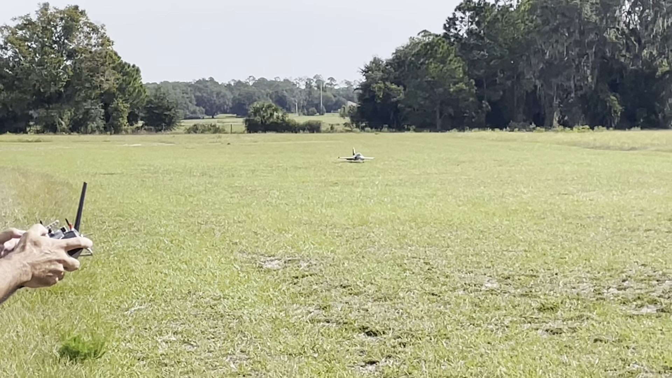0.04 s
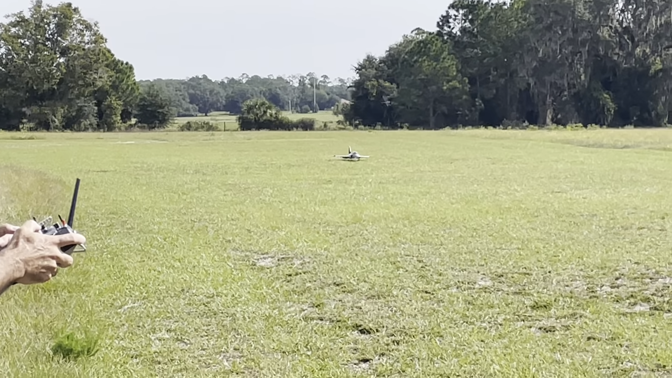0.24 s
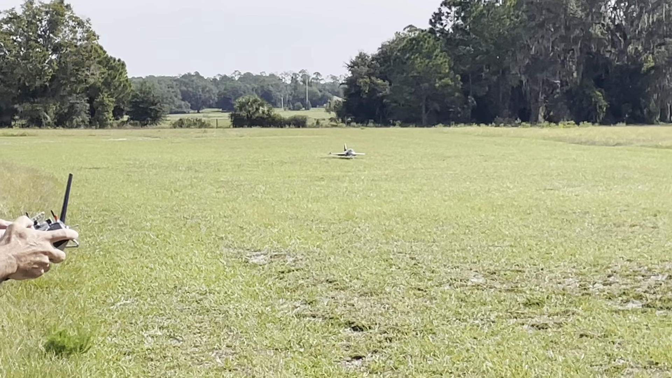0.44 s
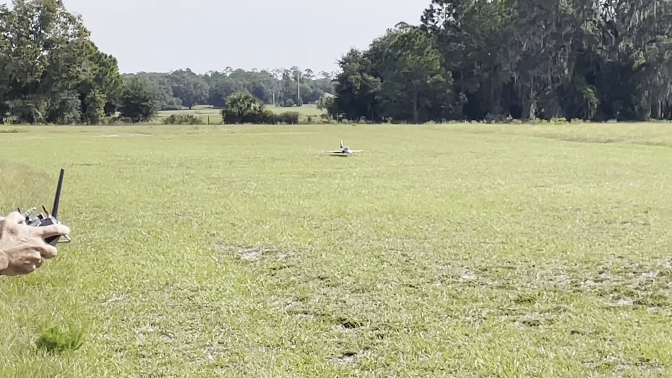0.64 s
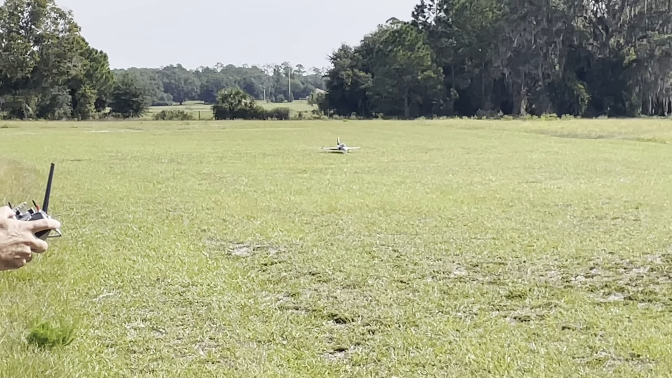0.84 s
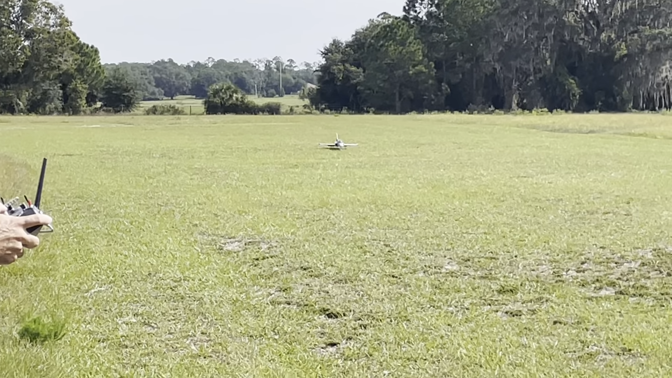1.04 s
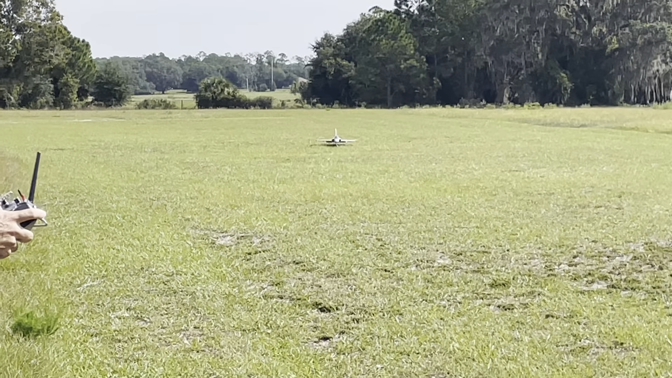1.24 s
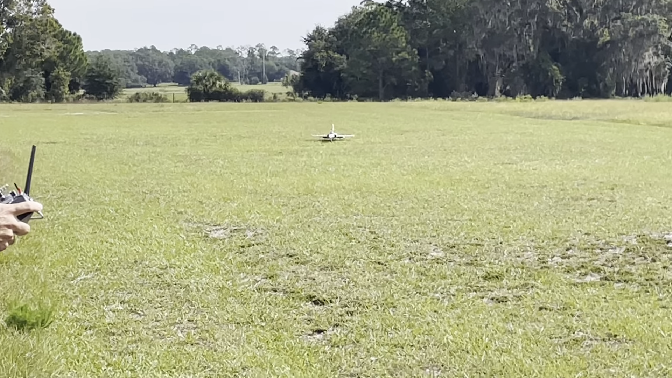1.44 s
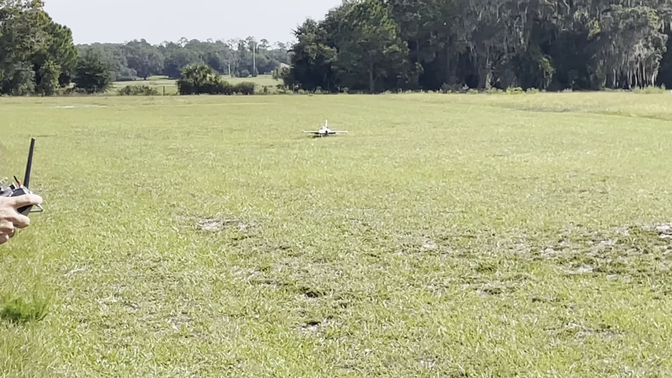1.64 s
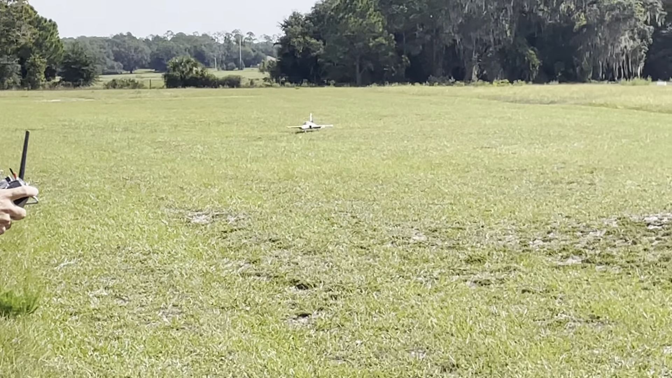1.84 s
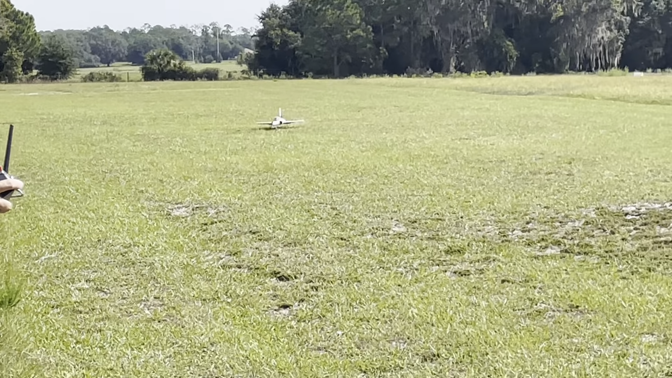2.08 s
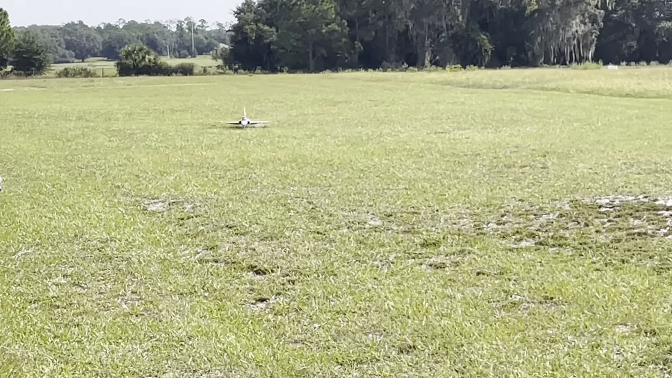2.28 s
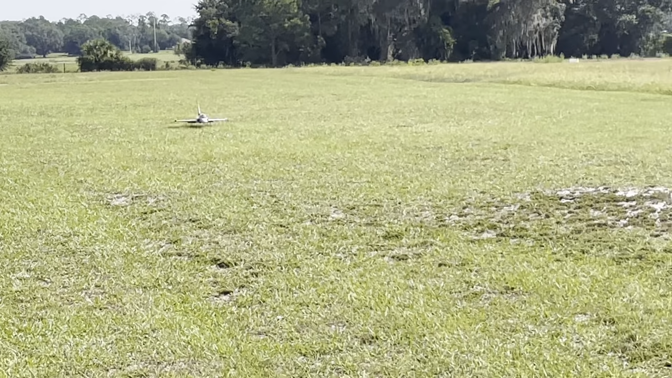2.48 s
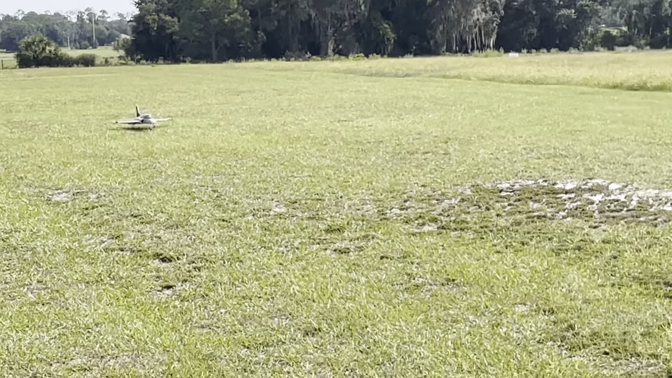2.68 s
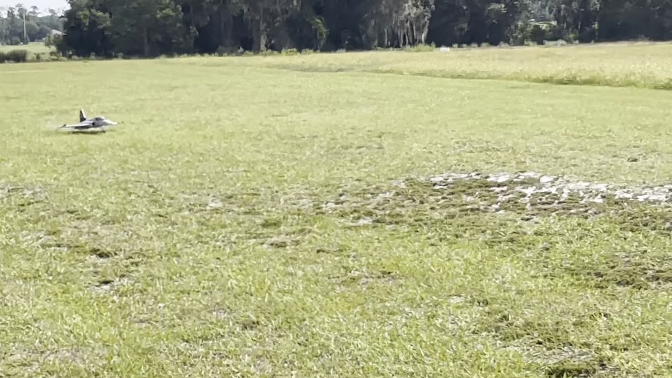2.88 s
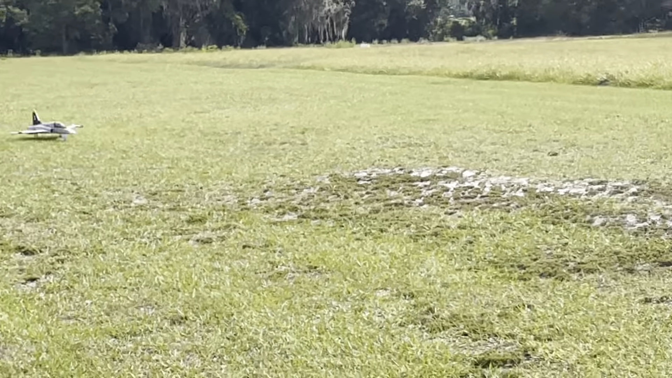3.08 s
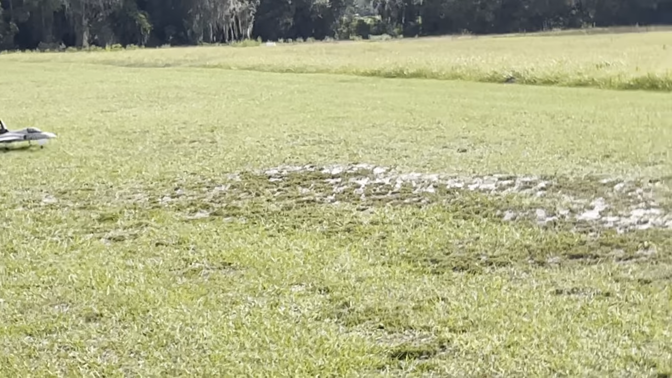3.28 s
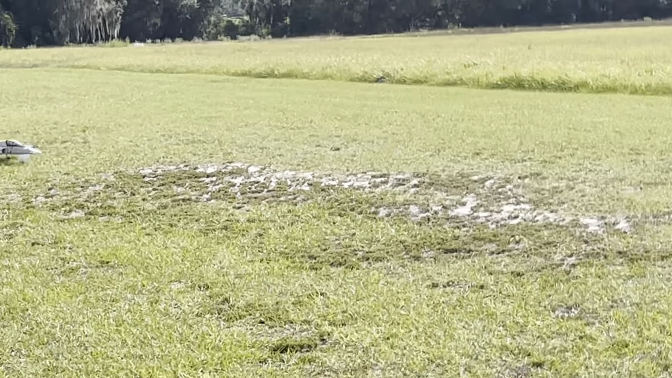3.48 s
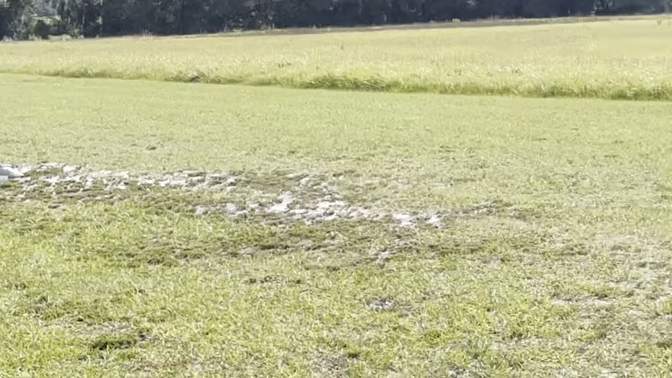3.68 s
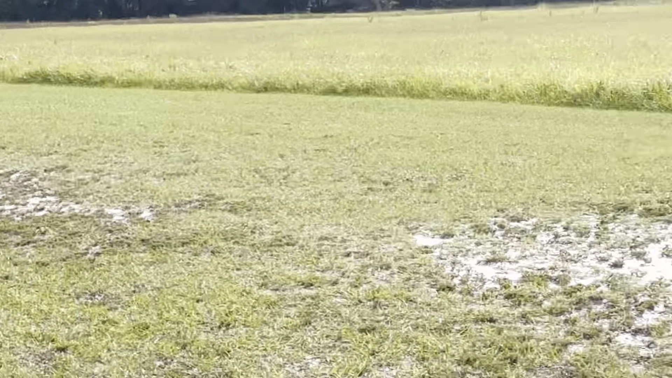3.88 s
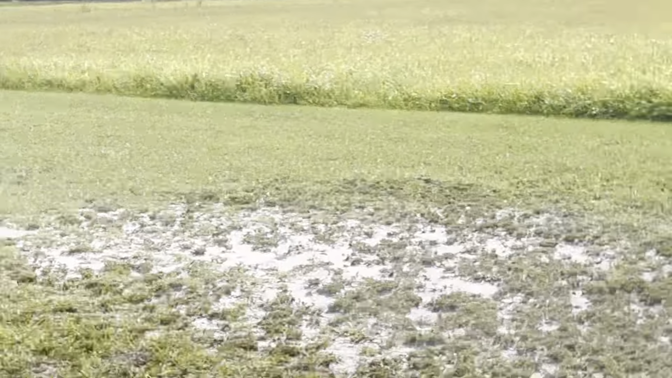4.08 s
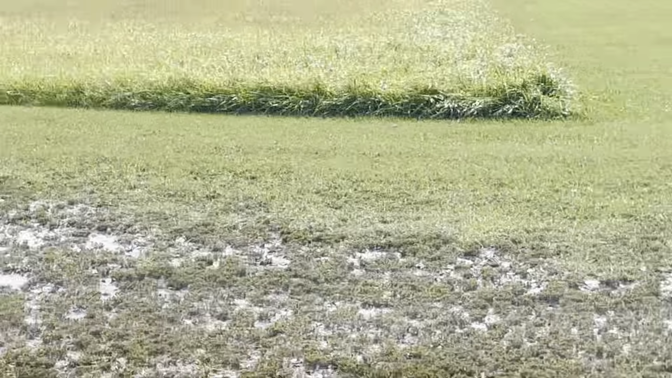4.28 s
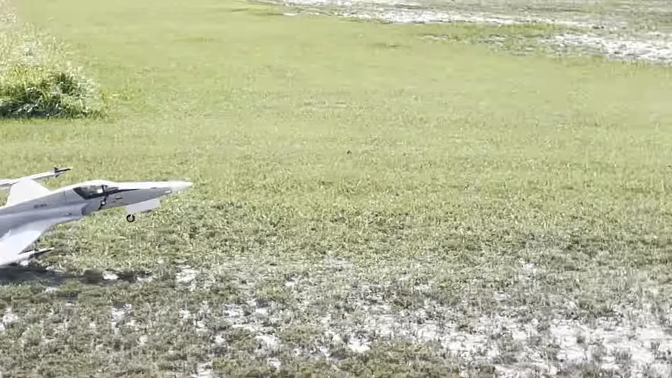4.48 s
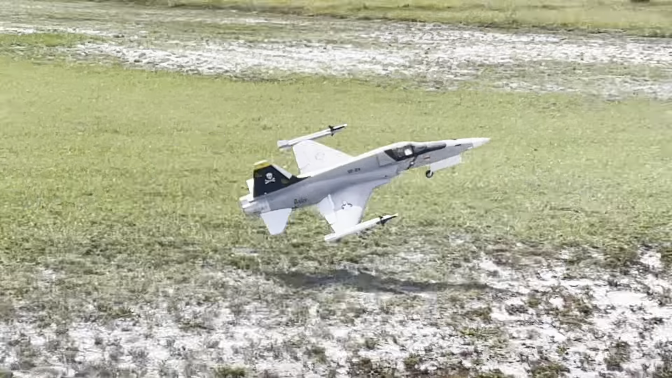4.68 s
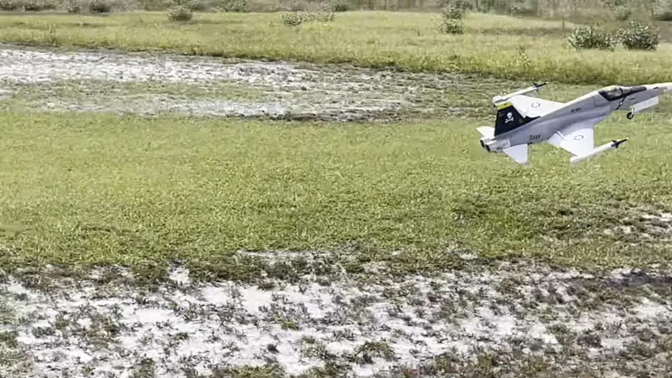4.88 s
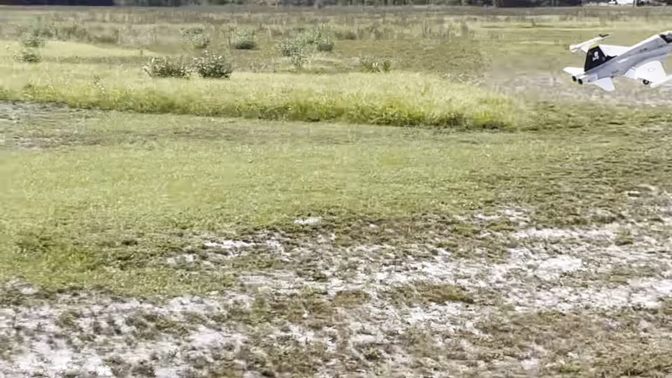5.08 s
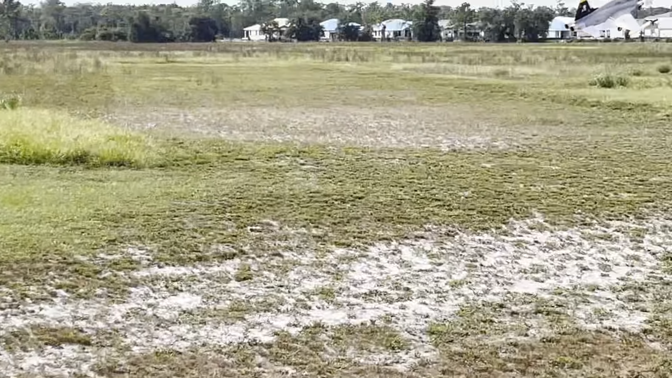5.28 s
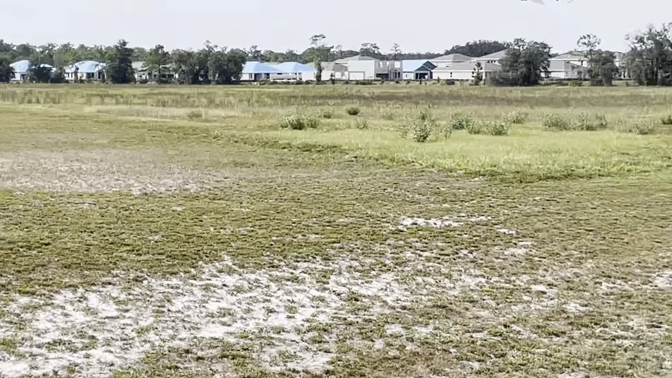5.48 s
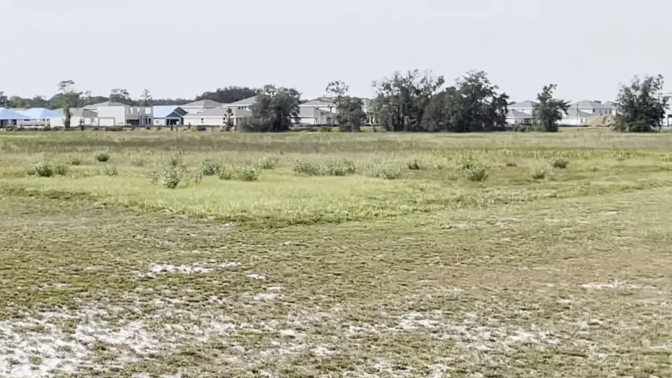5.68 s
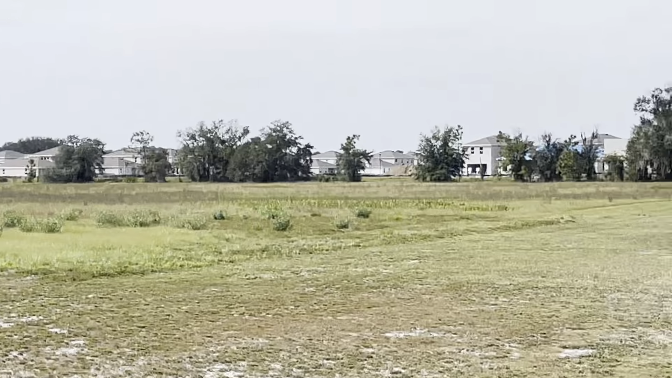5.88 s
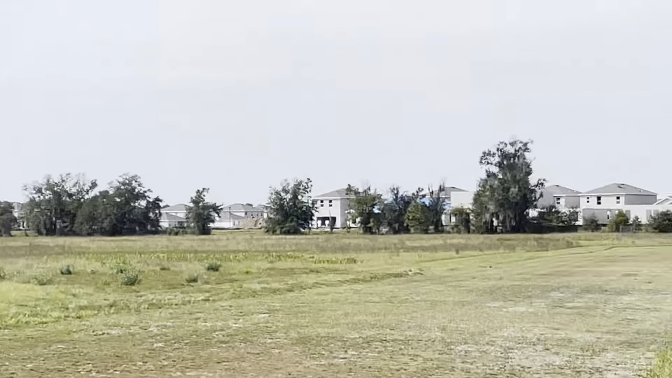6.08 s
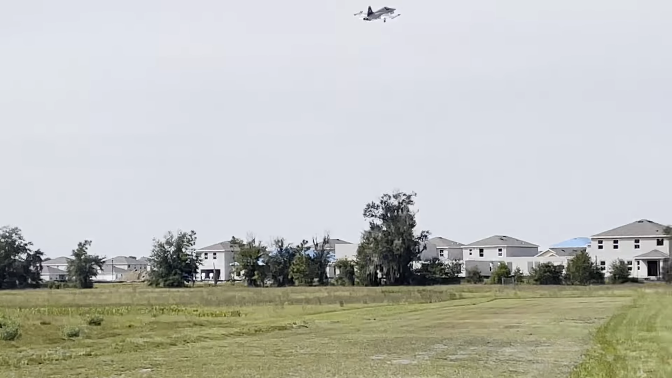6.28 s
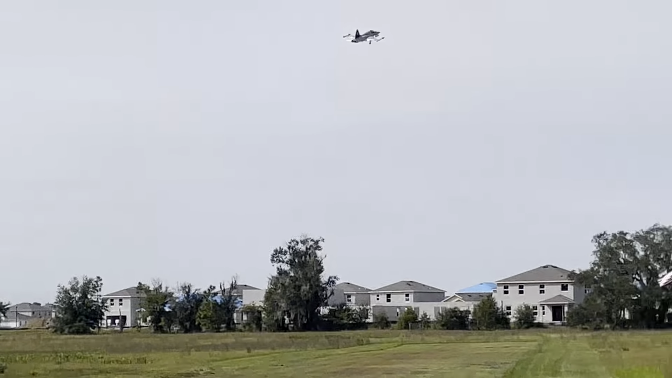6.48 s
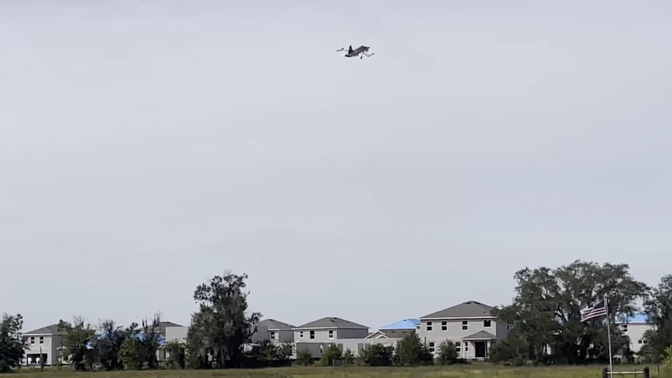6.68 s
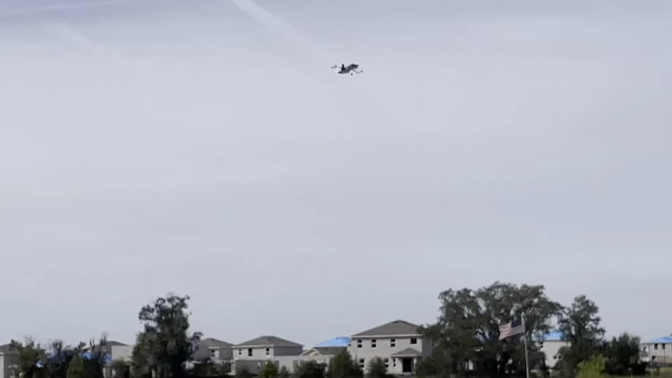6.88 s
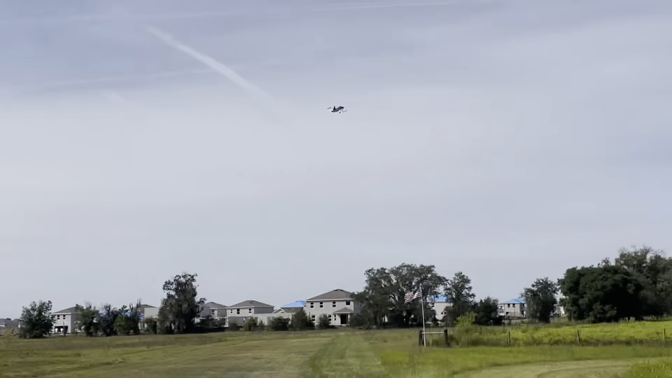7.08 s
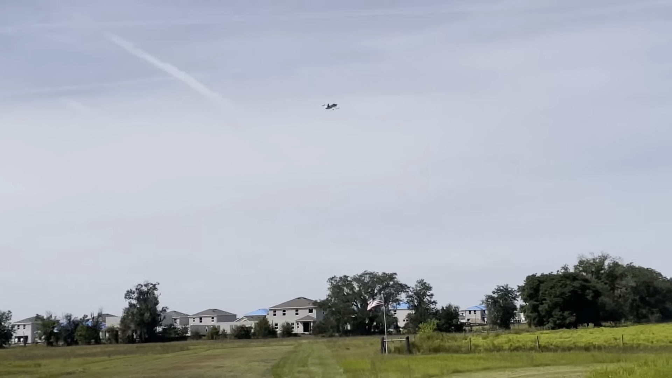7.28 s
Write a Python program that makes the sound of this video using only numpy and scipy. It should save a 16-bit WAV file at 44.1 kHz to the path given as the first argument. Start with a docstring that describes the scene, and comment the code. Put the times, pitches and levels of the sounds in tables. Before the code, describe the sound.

Rising whine and rushing air from an electric model jet taking off, passing close and receding, with light wind thumping the microphone.

```python
"""A grass airfield in light wind, heard from one microphone and widened to stereo. A model jet spools up
its twelve-blade electric ducted fan, rushes past close by, lifts off and throttles back in the climb.
Shaft and blades whine, dropping in pitch as they pass; air roars from duct and nozzle, combed by its
bounce off the grass. Far away a propeller aircraft drones over a faint hum and the hush of air and leaves,
and gusts thump right on the microphone."""
import sys
import numpy as np
from scipy import signal
from scipy.fft import rfft, irfft, next_fast_len
from scipy.io import wavfile
from scipy.ndimage import uniform_filter1d

SR = 44100
rng = np.random.default_rng(int(sys.argv[2]) if len(sys.argv) > 2 else 0)


def master(y):
    """Save y as 16-bit WAV."""
    cut = np.clip(np.atleast_2d(y).T, -1, 1)
    pcm = np.round(cut * 32767)  # scale
    wavfile.write(sys.argv[1], SR, pcm.astype(np.int16))


N = 323694
T = np.arange(N) / SR


def gain_of(db):
    """Decibels to a factor."""
    return 10 ** (np.asarray(db) / 20)


def unit_rms(x):
    """Scales to rms 1."""
    return x / np.sqrt(np.mean(x ** 2) + 1e-20)


def at_hz(points, hz):
    """A spectrum table at the given frequencies."""
    f, value = np.transpose(points)
    return np.interp(np.log(hz + 1), np.log(f + 1), value)


def at_time(rows, t):
    """All columns of a curve table at the given times."""
    times, *columns = np.transpose(rows)
    return [np.interp(t, times, column) for column in columns]


def wander(top_hz, t):
    """Random drift of rms 1: sines of random phase, the slow ones taller."""
    hz = np.geomspace(top_hz / 30, top_hz, 24)[:, None]
    coarse = np.linspace(0, t[-1], 3000)
    waves = np.sin(2 * np.pi * (hz * coarse + rng.random(hz.shape))) / hz ** .25
    return np.interp(t, coarse, unit_rms(waves.sum(0)))


def tone(hz, db):
    """A sine that follows a pitch curve, at an rms level."""
    return np.sqrt(2) * gain_of(db) * np.sin(2 * np.pi * (np.cumsum(hz) / SR + rng.random()))


def noise(shape, size):
    """Noise whose short-time spectrum follows shape(frequency, time)."""
    hop = size // 4
    hz, t = np.fft.rfftfreq(size, 1 / SR)[:, None], np.arange(N // hop + 5) * hop / SR
    real, imag = rng.standard_normal((len(t), len(hz), 2)).T
    return signal.istft((real + 1j * imag) * shape(hz, t), nperseg=size, noverlap=size - hop)[1][:N]


# Throttle moves: (time [s], shaft speed the fan spools to [Hz])
THROTTLE = [(0, 425), (.27, 433), (.39, 457), (.54, 467), (.66, 474), (1.13, 492), (1.24, 508), (1.48, 522),
            (1.62, 538), (2.08, 553), (2.37, 565), (2.56, 585), (2.63, 600), (2.81, 617), (2.93, 620),
            (5.275, 547), (7.2, 556)]
# Pitch at the microphone as the jet passes, against its approach: (time [s], pitch [factor])
DOPPLER = [(0, 1), (3.45, 1), (3.7, .9955), (4.14, .986), (4.37, .9745), (4.55, .967), (4.8, .9415),
           (4.92, .932), (5.06, .922), (5.28, .912), (5.98, .908), (6.44, .9025), (7.34, .9)]
def shaft_pitch(start_hz=408.8, spool_up_s=.03, spool_down_s=.042):
    """The rotor follows each throttle move through two equal lags; the jet's motion shifts the pitch."""
    hz, before_hz = np.full(N, start_hz), start_hz
    for start, to_hz in THROTTLE:
        lags = np.maximum(T - start, 0) / (spool_up_s if to_hz > before_hz else spool_down_s)
        hz = hz + (to_hz - before_hz) * (1 - (1 + lags) * np.exp(-lags))
        before_hz = to_hz
    return hz * at_time(DOPPLER, T)[0]


# Reflection off the grass, later as the jet climbs: (time [s], lag [ms], strength [0-1])
GROUND = [(0, .3, 0), (4.4, .3, .02), (4.75, .37, .4), (4.85, .5, .55), (5.1, .85, .6), (5.3, 1.15, .58),
          (5.55, 1.42, .65), (6, 1.8, .55), (6.4, 2.02, .55), (6.8, 2.23, .6), (7.34, 2.48, .6)]
def ground_bounce(hz, t, grass_db_per_khz=-.75, soft_turns=.41, soft_hz=2470, soft_ms=1.45):
    """Gain of the direct sound plus its ground reflection, which the grass dulls."""
    lag_ms, strength = at_time(GROUND, t)
    strength = strength * gain_of(grass_db_per_khz * hz / 1e3)
    # soft ground holds low notes back by part of a cycle, most at flat angles
    held_back = soft_turns * np.exp(-hz / soft_hz - (lag_ms / soft_ms) ** 2)
    turns = hz * lag_ms / 1e3 + held_back
    return abs(1 + strength * np.exp(-2j * np.pi * turns)) / np.sqrt(1 + strength ** 2)


# Four shaft tones, the blade tone and its octave: (order [multiple of shaft speed])
FAN_ORDERS = (1, 2, 3, 4, 12, 24)
# The fan from the microphone's spot: (time [s], level of each of the six orders [dB])
FAN_LEVELS = [(0, -68, -78, -68, -80, -61, -67), (.4, -61, -73, -67, -80, -57.5, -86),
              (.75, -52, -78, -66.5, -80, -58.5, -73), (1.1, -51.5, -78, -66, -80, -58, -70),
              (1.35, -48, -68, -72, -80, -57.5, -78), (1.75, -40.5, -63, -69, -80, -60, -80),
              (2.3, -41, -65, -63, -78, -55.5, -76), (2.55, -47.5, -66, -69, -80, -51, -65),
              (3.0, -37, -49, -50.5, -73, -39.5, -65), (3.4, -28.5, -43.5, -49.5, -60, -29.5, -54),
              (3.7, -23, -39.5, -41, -55.5, -34, -44), (4.0, -22.5, -35, -41, -65, -25.5, -46),
              (4.3, -16.5, -30, -31, -41.5, -24, -44), (4.6, -11, -35.5, -40, -36, -32, -48),
              (4.8, -23.5, -31, -36, -35.5, -30, -52), (5.05, -33, -31.5, -42.5, -39.5, -29, -50),
              (5.28, -32.5, -40, -37, -46.5, -28, -56), (5.42, -32.5, -38.5, -35.5, -42, -31.5, -56),
              (5.6, -32.5, -44, -42, -51, -47.5, -55), (5.95, -35.5, -41, -42, -56.5, -47, -57),
              (6.3, -38, -46.5, -42, -50.5, -56, -64), (6.7, -40, -45.5, -48.5, -64, -61, -70),
              (7.15, -43.5, -50, -51, -76, -60, -80), (7.34, -46, -52.5, -46, -78, -60, -82)]
# One tone dips or swells for a moment: the shaft orders dip as direct and reflected paths meet, while the blade
# tone also fades and surges on its own: (time [s], order [multiple], change [dB], half-length [s])
FADES = [(2.75, 1, -9, 0.11), (5.02, 1, -13, 0.093), (4.58, 2, -15, 0.07), (4.62, 3, -18, .07),
         (5.0, 3, -21, 0.035), (5.8, 3, -11, 0.11), (4.43, 4, -10, 0.061), (4.58, 4, -14, 0.036),
         (4.85, 4, -13, 0.035), (2.4, 12, -24, 0.072), (3.214, 12, -15, 0.12), (5.35, 12, -16, 0.03),
         (0.19, 12, -10, 0.12), (0.7, 12, -3, .08), (0.396, 12, 6, 0.059), (1.4, 12, 8.5, 0.085),
         (2.0, 12, -9, 0.051), (3.51, 12, -7, 0.042), (4.45, 12, -7, 0.044), (4.65, 12, -9, 0.032),
         (4.86, 12, -7, 0.033), (5.94, 12, 7, .06), (2.5, 24, 5, .06), (5.94, 24, -12, 0.099)]
# Faint tones riding on the rush of air: (order [multiple], level against the rush [dB])
FAINT_ORDERS = [(5, -18.5), (6, -22), (7, -25), (8, -24), (9, -24), (10, -26), (11, -26), (13, -27)]
# They emerge once the fan is at full speed: (time [s], gain [dB])
FAINT_LIFT = [(0, -12), (2.7, -12), (3.1, -2), (4.6, -2), (5.3, -4), (5.6, 0), (7.34, 0)]
def fan_whine(flutter_db=.8, jitter=.0004):
    """Shaft orders and blade tones; turbulent air shakes the high ones most."""
    shaft_hz = shaft_pitch() * (1 + jitter * wander(40, T))
    faint_db = RUSH_DB + at_time(RUSH, T)[0] + at_time(FAINT_LIFT, T)[0]
    whine = 0
    for order, db in zip(FAN_ORDERS, at_time(FAN_LEVELS, T)):
        fades_db = sum(change_db * np.exp(-((T - centre) / half) ** 2)
                       for centre, faded, change_db, half in FADES if faded == order)
        flutter = flutter_db * np.sqrt(order) * wander(30, T)
        whine = whine + tone(order * shaft_hz, db + fades_db + flutter)
    for order, db in FAINT_ORDERS:
        hz = order * shaft_hz
        whine = whine + ground_bounce(hz, T) * tone(hz, faint_db + db + 3 * wander(6, T))
    return whine


RUSH_DB, TREBLE_HZ = -26, 10500  # base level of the 3-7 kHz band; where the treble column holds as listed
# Centres of the rush's bass, middle and body: (frequency [Hz])
ZONES_HZ = (287, 1080, 4320)
# The rush shifts with distance and nozzle angle to the microphone:
# (time [s], body level [dB], bass [dB], middle [dB], treble [dB]), the last three against the body
RUSH = [(0, -23.5, 7.5, -5.5, -16), (.9, -22, 7, -3, -15), (1.2, -22, 8.5, -2.5, -10),
        (1.5, -19, 8, -4.5, -10), (2.1, -20, 11, 2, -6), (2.4, -22.5, 9, 6.5, -4.5),
        (2.6, -15.5, 3, -0.5, -13), (2.7, -14.5, 6.5, -0.5, -2.5), (3.0, -9, 1, -4, -3.5),
        (3.28, -12, 4.5, 3.5, 0), (3.42, -11.5, 6, 3.5, 6), (3.5, -9, 7.5, 3.5, 0.5),
        (3.6, -4.5, 0.5, 0, 5.5), (3.7, -2.3, -1, -1.5, .5), (3.82, .3, 2, -.5, 2.5), (4.0, 0.1, 2, 2.5, 5),
        (4.1, -.5, 3, 1.5, 3), (4.22, -1.8, 6, 2.5, 6.5), (4.45, -2, 0, 2, 0), (4.7, -2, -4, 3.5, 0),
        (4.82, 0.4, -10, 0.5, -0.5), (5.15, -0.4, -9, -0.5, 2), (5.32, -3, -14, -1.5, 3),
        (5.5, -7.5, -6, 1, 1), (5.9, -9, -7.5, -2, 0), (6.2, -10, -11, -.5, -7), (6.3, -9, -14, -2, -5),
        (6.43, -15, -7, 3.5, -10.5), (6.6, -11.3, -12, -1.5, -5), (6.88, -13, -12.5, 1.5, -6.5),
        (7.08, -10.5, -14, -2, -5), (7.2, -13.5, -10, -.5, -14), (7.34, -16, -7, -0.5, -25)]
# The rush at close range: (frequency [Hz], level [dB])
RUSH_COLOUR = [(60, -21), (130, 3), (200, 1.5), (400, 8.5), (850, 6.5), (1400, 2.5), (2300, -1), (3100, -4),
               (3600, -2.5), (5400, 0), (6200, 3.5), (8500, -1), (12000, -10.5), (15000, -13.5)]
# Colour of sound that skims low over the grass: (frequency [Hz], gain [dB])
SKIM_COLOUR = [(150, 1.9), (650, -2), (1000, 0.3), (1500, 2), (2000, -1), (2350, -4), (2750, -6), (3100, 1),
               (3800, 3.5), (5000, -1), (6500, 0), (9000, 0.7)]
# How strongly that colour reaches the microphone: (time [s], weight [factor])
SKIM_WEIGHT = [(0, 0.39), (1.5, 1.33), (2.6, 1.05), (3.4, 0.6), (4.2, 0.0017), (4.7, 0.007), (7.34, 0.4)]
def air_rush(patchy_db=1.4, flicker_db=.9):
    """Jet noise from duct and nozzle, combed by the ground bounce; nearby, the treble flickers."""
    def shape(hz, t):
        body_db, bass_db, middle_db, treble_db = at_time(RUSH, t)
        bass, middle = (np.interp(np.log(hz + 1), np.log(ZONES_HZ), row) for row in np.eye(3)[:2])
        treble = np.maximum(hz - ZONES_HZ[2], 0) / (TREBLE_HZ - ZONES_HZ[2])  # air absorbs highs most
        tilt_db = bass * bass_db + middle * middle_db + treble * treble_db
        skim_db = at_time(SKIM_WEIGHT, t)[0] * at_hz(SKIM_COLOUR, hz)
        patches = rng.standard_normal((len(t), len(hz))).T
        patches = unit_rms(uniform_filter1d(uniform_filter1d(patches, 14, axis=0), 16, axis=1))
        flicker = flicker_db * wander(14, t) * np.sqrt(hz / 8000) * gain_of(body_db / 4)
        colour = gain_of(at_hz(RUSH_COLOUR, hz))
        colour = colour / np.sqrt(2 * np.sum(colour[(hz > 3000) & (hz < 7000)] ** 2))
        level_db = RUSH_DB + body_db + tilt_db + skim_db + patchy_db * patches + flicker
        return colour * ground_bounce(hz, t) * gain_of(level_db)
    return noise(shape, size=1024)


# An aircraft far from the field: (time [s], blade rate [Hz], level [dB], overtones against it [dB])
PROPELLER = [(0, 83.1, -45.5, -17), (.8, 83.4, -41, -41), (2.4, 80.7, -39.5, -15), (4, 79.28, -38.5, -21),
             (5, 78.27, -36.5, -13.5), (6.2, 77.74, -41.5, -13.5), (7.34, 77.2, -38.5, -10.5)]
# Its overtones: (order [multiple of blade rate], further gain [dB])
PROPELLER_OVERTONES = [(2, -2), (3, -7), (4, -5.5)]
def propeller_drone():
    """The distant propeller's blade tone and overtones, fading in and out a little on the air."""
    hz, db, overtone_db = at_time(PROPELLER, T)
    hz = hz * (1 + .00332 * wander(3.02, T))
    blade_tone = tone(hz, db + .41 * wander(3.7, T))
    return blade_tone + sum(tone(order * hz, db + overtone_db + step_db + 2 * wander(4, T))
                            for order, step_db in PROPELLER_OVERTONES)


# A hum in the background: (time [s], level [dB])
HUM = [(0, -50.5), (3.3, -53.5), (4.5, -83), (7.34, -47)]
def faint_hum(hz=131):
    """One low, steady pitch that sinks away and returns."""
    return tone(np.full(N, hz), at_time(HUM, T)[0] + .4 * wander(3.04, T))


# The open field all round the microphone: (frequency [Hz], level [dB])
HUSH_COLOUR = [(100, 2), (300, 10), (1000, -37), (2500, -13), (6000, -28), (10000, -9), (12000, -14),
               (16000, -29)]
def field_hush(level_db=-58.5):
    """The smooth, steady noise of distant air and leaves."""
    return gain_of(level_db) * unit_rms(noise(lambda hz, t: gain_of(at_hz(HUSH_COLOUR, hz)), size=1024))


# Wind right on the microphone: (frequency [Hz], level [dB])
WIND_COLOUR = [(20, -40), (35, -16), (48, 0), (65, 1), (85, -3), (130, -11), (200, -16), (400, -40),
               (1500, -100)]
# Gusts striking it: (peak time [s], decay [s], level [dB])
GUSTS = [(.65, 0.054, -36), (0.93, .12, -37), (1.12, .2, -44), (1.74, .06, -41), (1.96, 0.17, -36),
         (2.247, 0.26, -36.5), (2.8, .07, -40.5), (3.19, 0.25, -37), (3.527, .07, -29), (3.663, .22, -36),
         (4.124, 0.053, -32), (4.25, 0.14, -35), (4.501, 0.048, -41), (4.62, 0.34, -43)]
def wind_thumps(breeze_db=-50, rise_s=.047):
    """Low lumpy pressure swings on the microphone: a breeze, and gusts that rise fast and die away."""
    lumps = unit_rms(noise(lambda hz, t: gain_of(at_hz(WIND_COLOUR, hz)), size=2048))
    gusts = sum(gain_of(db) * np.exp(-((T - peak) / np.where(T < peak, rise_s, decay_s)) ** 2)
                for peak, decay_s, db in GUSTS)
    return lumps * (gain_of(breeze_db) + gusts) * gain_of(2 * wander(20, T))


# Stereo width of the noise, band by band; zero in some bands: (frequency [Hz], width [factor])
STEREO_WIDTH = [(60, .18), (200, .2), (1000, .12), (1800, .45), (2200, 0), (5750, 0), (5900, .1),
                (7800, .1), (8000, 0), (8500, 0), (9000, .3), (10700, .3), (10950, 0), (12250, 0),
                (12450, .4), (14000, .2), (14400, 0)]
# Left-right phase shift: (frequency [Hz], lead of the left [half-turns])
STEREO_PHASE = [(80, .08), (250, .03), (600, .12), (1200, .15), (1750, .25), (2100, 0), (5750, 0),
                (5900, -.14), (6900, -.33), (7400, -.58), (7950, -1), (8550, -1), (9000, -1.25),
                (10000, -1.58), (10700, -1.8), (10950, -2), (12250, -2), (12450, -2.3), (14000, -2.8),
                (14400, -3)]
# Left-right balance: (frequency [Hz], left minus right [dB])
STEREO_BALANCE = [(100, 0), (500, -.7), (1200, -.5), (1800, -1.5), (2100, 0)]
def widen_stereo(mono, side_noise):
    """Stereo widening: a left-right phase shift that turns with frequency, plus a little side noise."""
    size = next_fast_len(N + 4096)
    hz = np.fft.rfftfreq(size, 1 / SR)
    side = np.array([[1], [-1]])  # left, right
    spectra = rfft(mono, size) + side * 1j * at_hz(STEREO_WIDTH, hz) * rfft(side_noise, size)
    phase_shift = np.exp(.5j * np.pi * side * at_hz(STEREO_PHASE, hz))
    balance = gain_of(side * at_hz(STEREO_BALANCE, hz) / 2)
    return irfft(spectra * phase_shift * balance, size)[:, :N]


def scene():
    """The jet, the far aircraft and the field's own sounds at the microphone, widened to stereo."""
    mono = fan_whine() + air_rush() + propeller_drone() + faint_hum() + field_hush() + wind_thumps()
    side_noise = air_rush() + field_hush() + wind_thumps()
    return widen_stereo(mono, side_noise)


def record(dry):
    """The microphone's low cut, then the band limit."""
    low_cut_hz, top_hz = 38, 15720
    thinned = signal.sosfilt(signal.butter(2, low_cut_hz, "highpass", fs=SR, output="sos"), dry)
    band_limit = signal.firwin(1023, top_hz, window=("kaiser", 9), fs=SR)
    return signal.oaconvolve(thinned, band_limit[None], "same")


dry = scene()
out = record(dry)
master(out)
```